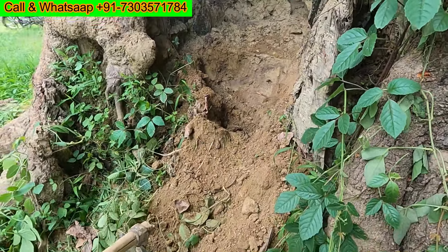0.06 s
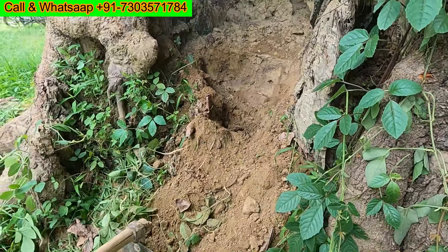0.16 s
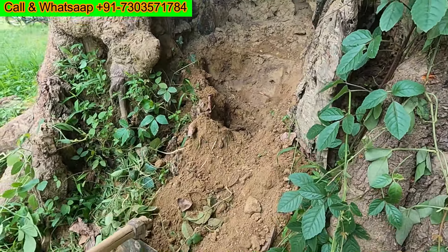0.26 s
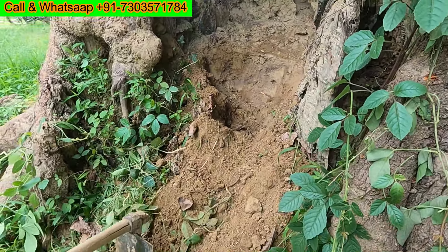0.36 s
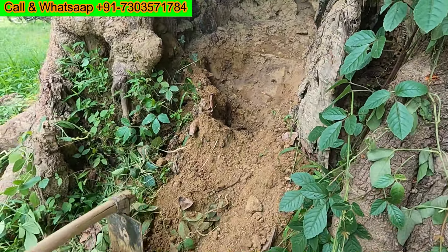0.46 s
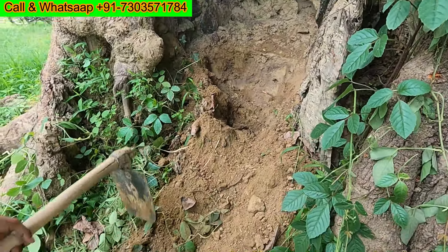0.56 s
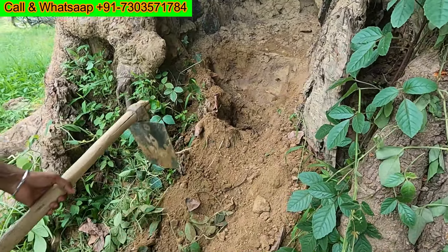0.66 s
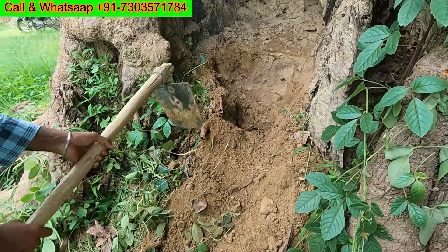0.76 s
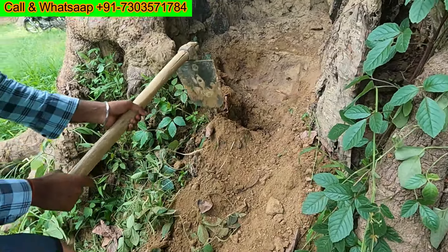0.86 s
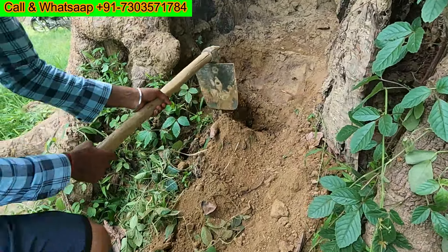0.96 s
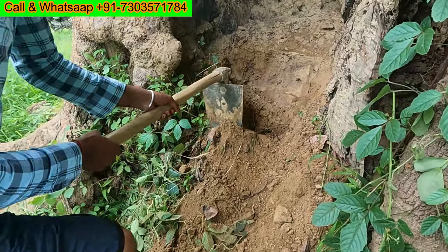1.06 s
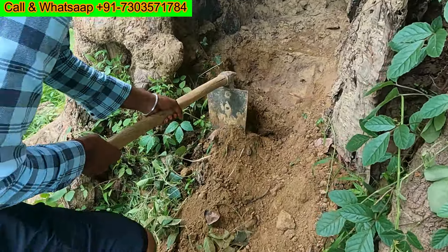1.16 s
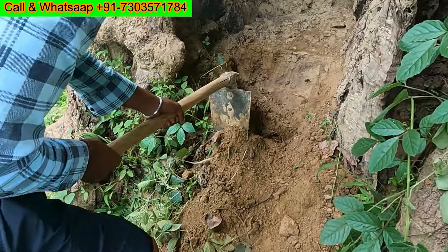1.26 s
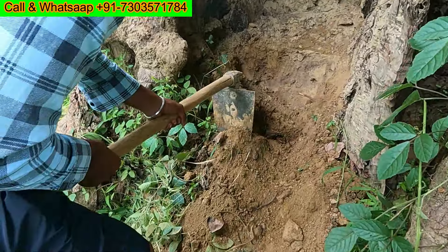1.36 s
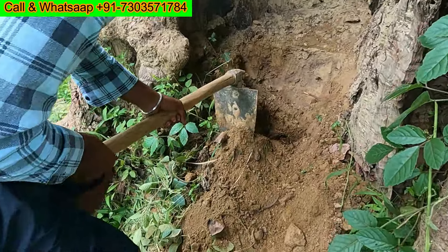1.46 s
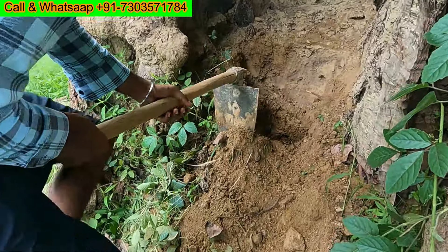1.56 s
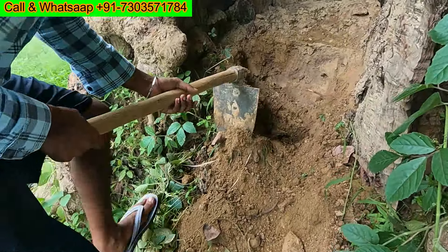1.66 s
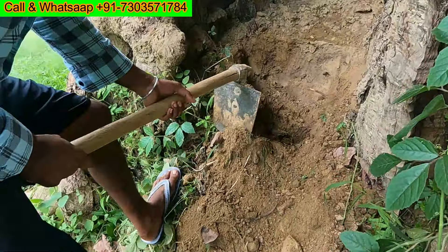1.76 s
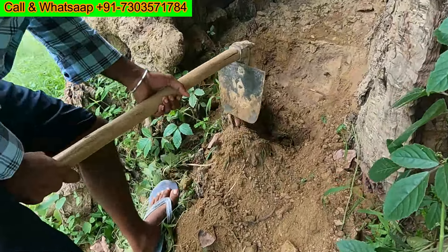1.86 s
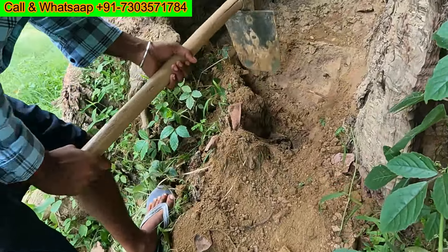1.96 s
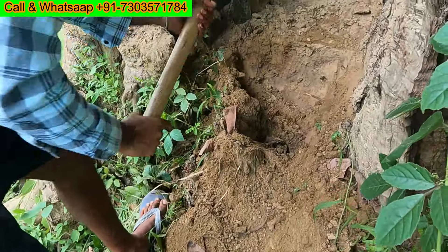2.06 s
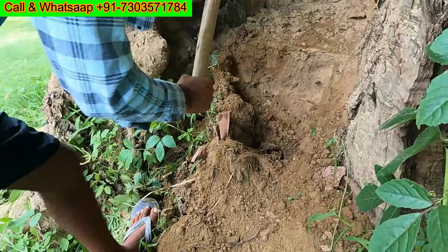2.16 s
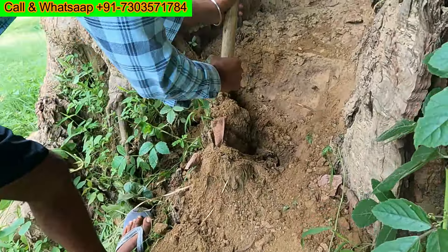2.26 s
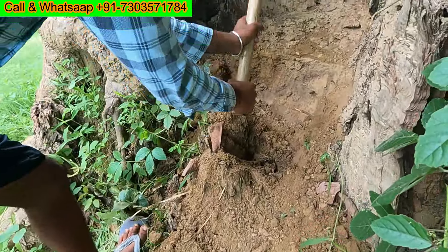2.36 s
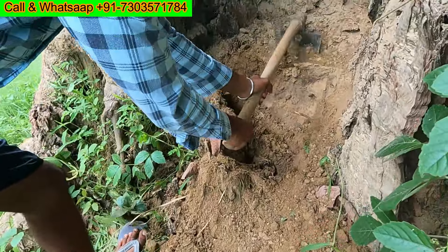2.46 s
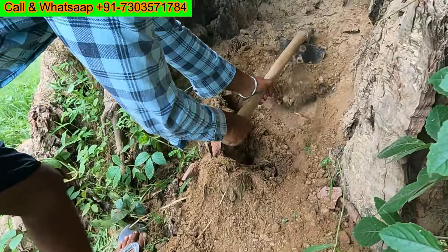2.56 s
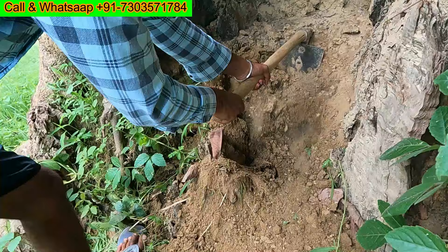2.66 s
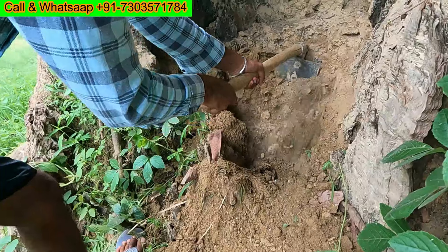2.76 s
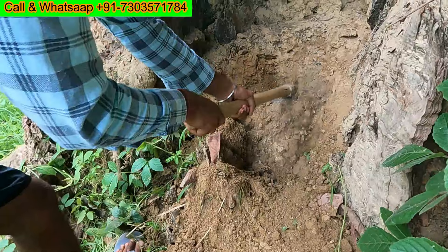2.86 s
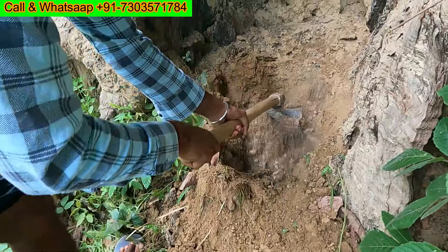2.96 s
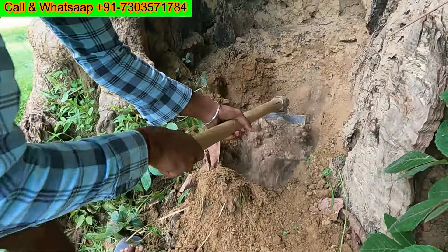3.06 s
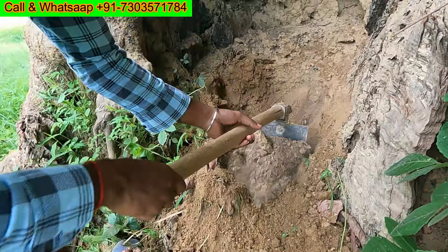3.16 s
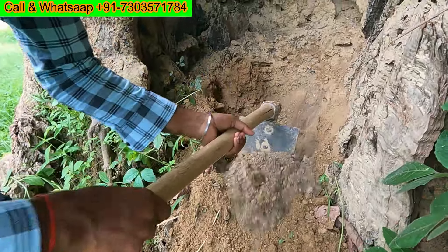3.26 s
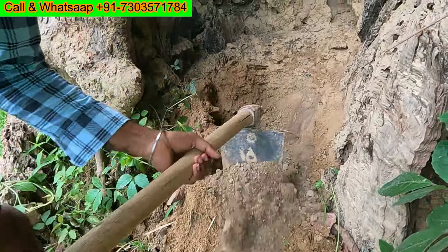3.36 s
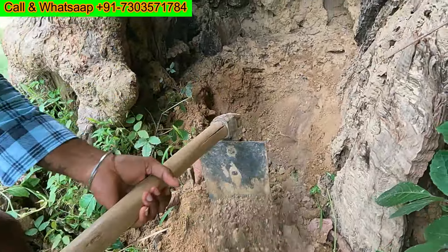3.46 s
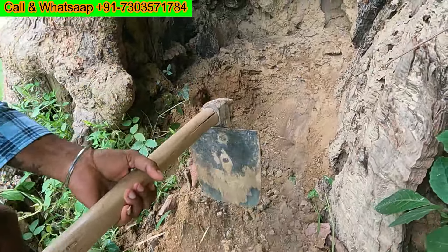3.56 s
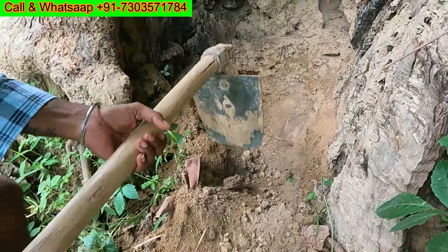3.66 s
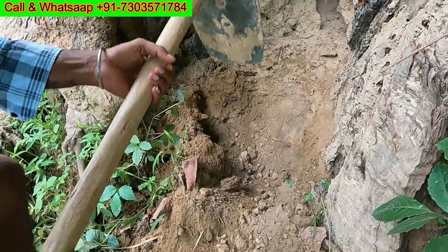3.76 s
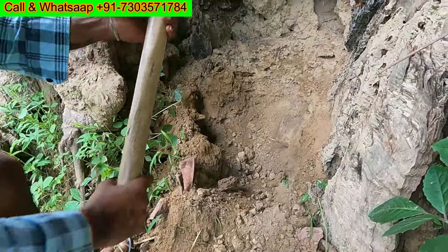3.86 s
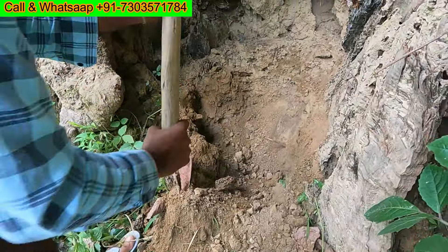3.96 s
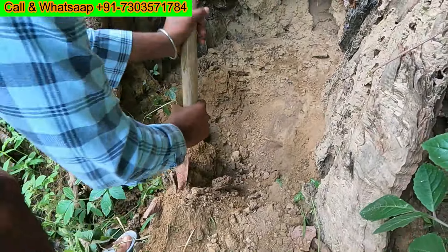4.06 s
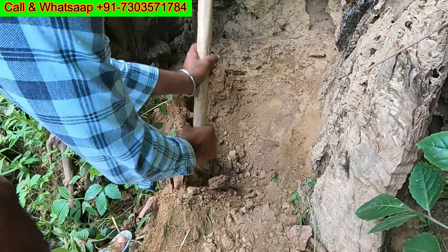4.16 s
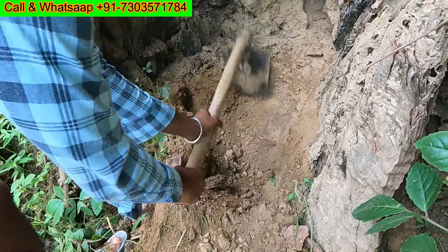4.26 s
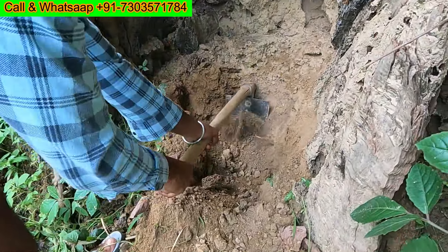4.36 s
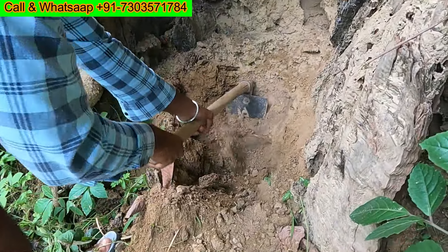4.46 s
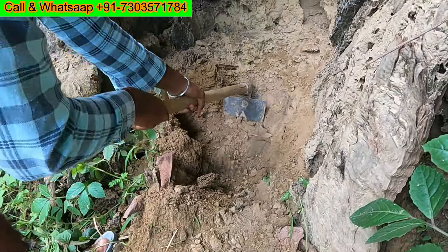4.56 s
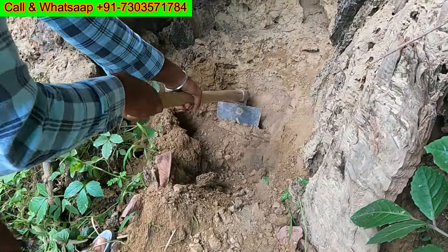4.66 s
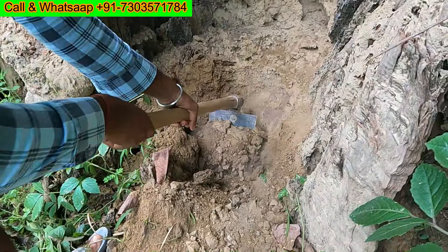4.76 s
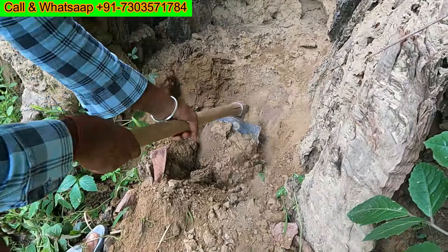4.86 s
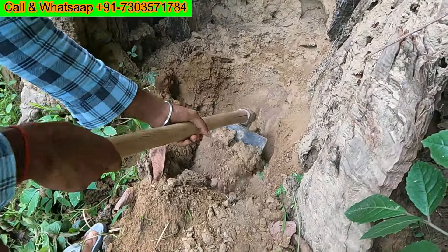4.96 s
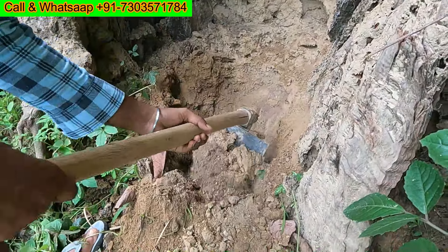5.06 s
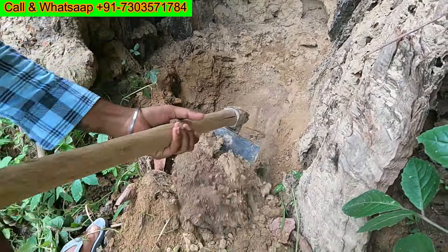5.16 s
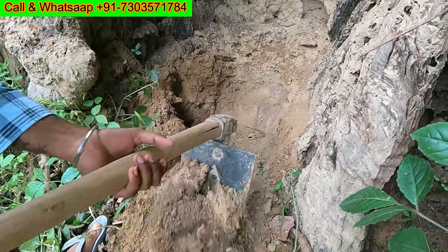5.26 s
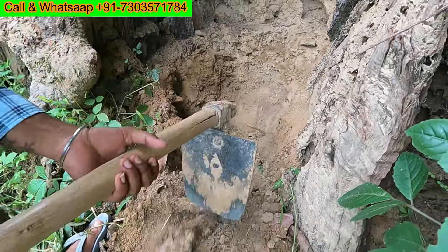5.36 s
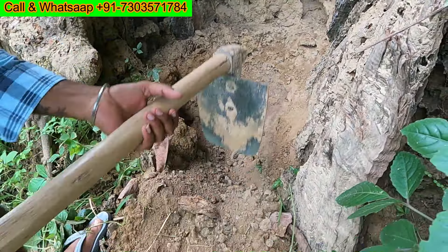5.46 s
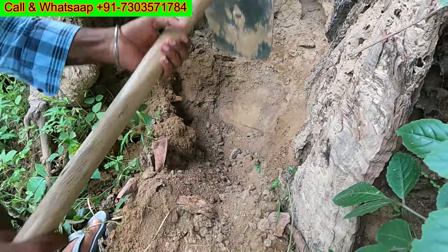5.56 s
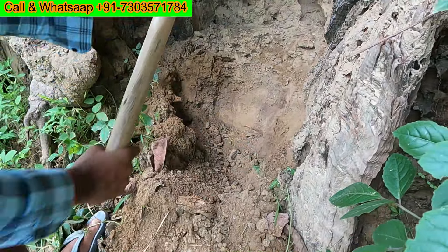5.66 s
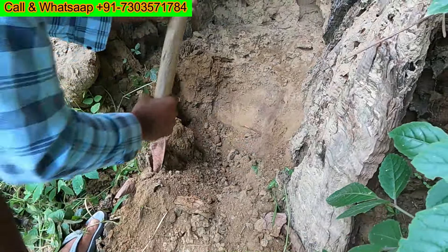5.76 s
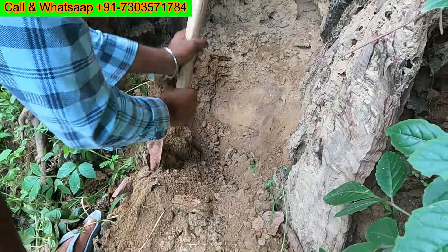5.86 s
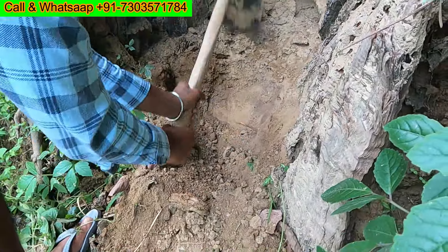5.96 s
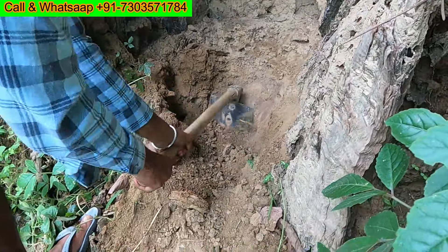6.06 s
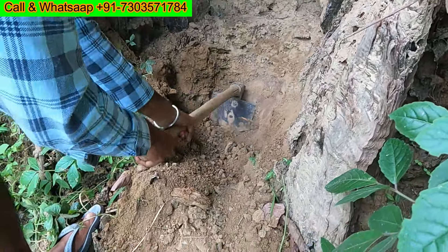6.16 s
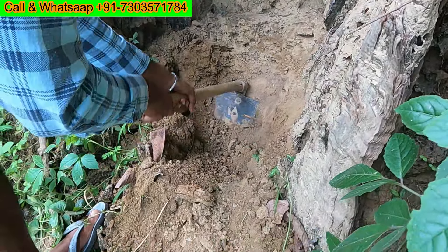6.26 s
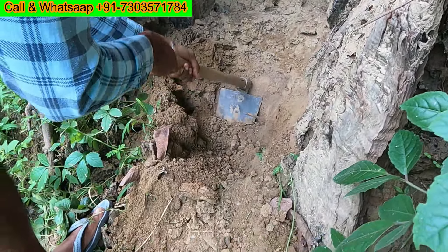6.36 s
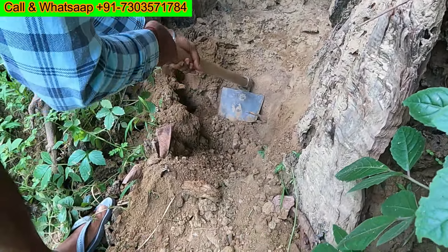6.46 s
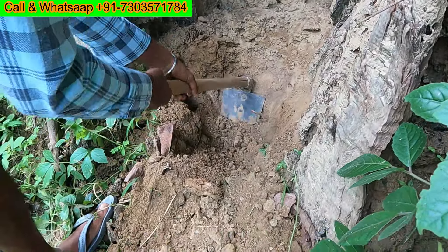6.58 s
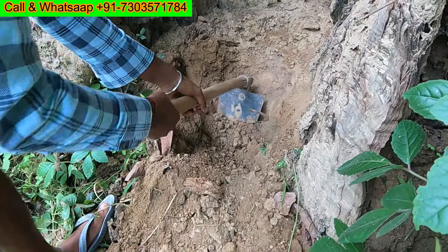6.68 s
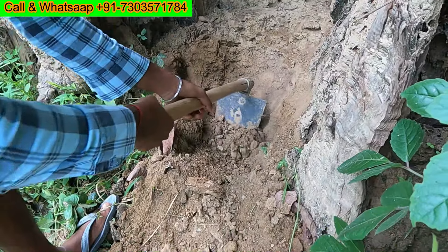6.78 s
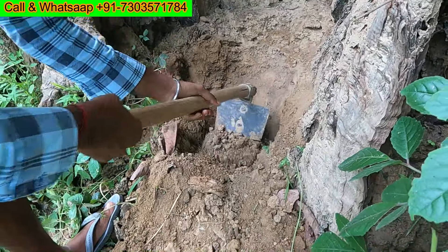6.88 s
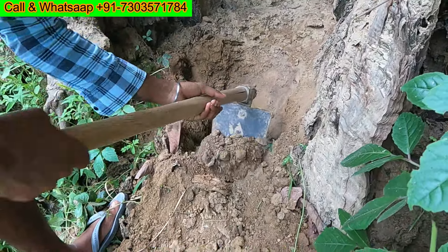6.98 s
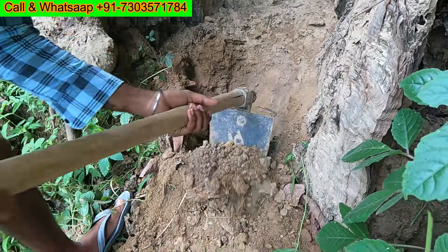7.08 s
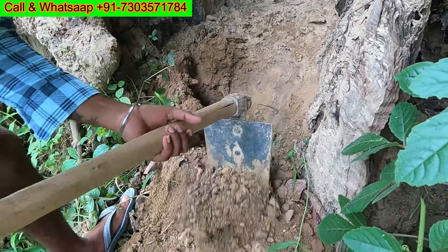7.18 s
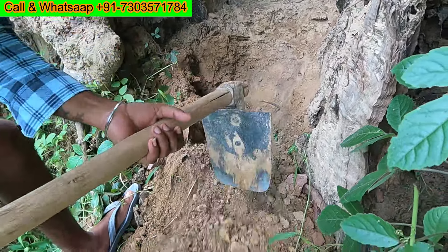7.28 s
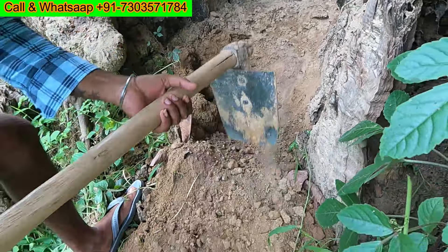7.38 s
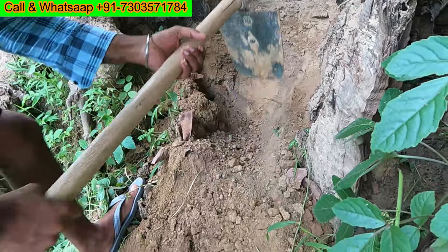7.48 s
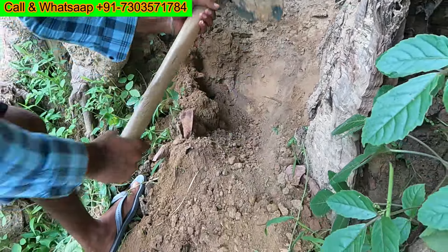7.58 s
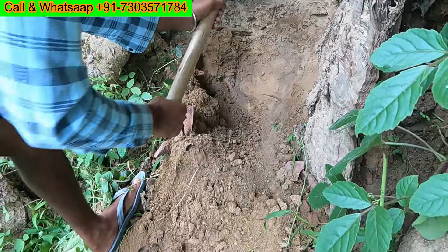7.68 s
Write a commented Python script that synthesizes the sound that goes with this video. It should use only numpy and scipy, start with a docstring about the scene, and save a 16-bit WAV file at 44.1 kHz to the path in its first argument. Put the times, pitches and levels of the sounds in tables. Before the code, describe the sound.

A steel hoe chops and scrapes dry soil outdoors, with uneven sharp strikes, dull thuds and crumbling earth under light wind.

```python
"""Hoeing dry soil beside a tree

A steel hoe chops into the soil, crushing grit, and clinks on stones and roots; the ground thuds
under blows and feet. Earth and leaves rustle, dragged clods tumble and rumble, and the wooden shaft
hums when levered. Wind blows on the microphone and a far motor drones faintly."""
import sys
import numpy as np
from scipy import signal
from scipy.fft import rfft, irfft, next_fast_len
from scipy.io import wavfile
from scipy.ndimage import uniform_filter1d, map_coordinates

SR = 44100
rng = np.random.default_rng(int(sys.argv[2]) if len(sys.argv) > 2 else 0)


def put_to_file(sound):
    """Save the sound as 16-bit audio at rate SR, in the file named by the first command-line argument."""
    columns = np.atleast_2d(sound).T  # one column per channel
    safe = np.clip(columns, -1, 1)
    whole_steps = np.round(safe * 32767)
    wavfile.write(sys.argv[1], SR, whole_steps.astype(np.int16))


N = 340452

# the steel blade's tones: (pitch [Hz], level [dB], time to fade by 60 dB when free of soil [s])
BLADE_TONES = [(613, -8.5, 0.041), (972, -7, 0.075), (1340, -9.5, 0.023), (1470, -13.5, 0.1),
               (2024, -9.5, 0.038), (2253, -9.5, 0.075), (3106, -9, 0.07), (3517, -7.5, 0.042),
               (3910, -5, 0.05), (4496, -8.5, .05), (4940, -7, 0.037), (5600, -10.5, 0.037),
               (6940, -13.5, 0.031)]
# the wooden shaft's hollow tones: (pitch [Hz], width [Hz], level [dB])
SHAFT_TONES = [(240, 50, -5), (338, 36, 2), (520, 60, -14)]
# the tone colour of packed earth: (frequency [Hz], level [dB])
CLOD_COLOUR = [(65, -10.5), (110, -6), (198, 2.5), (330, -8.5), (482, -10), (782, -10.5), (900, -22),
               (1170, -36.5), (1980, -120)]
# the thin, steady patter of earth: (time [s], level [dB])
PATTER = [(0, -58.5), (1.3, -55.5), (1.78, -60), (2.5, -61.5), (2.7, -60), (3.6, -67.5), (4.5, -63),
          (5.5, -58.5), (6.12, -64), (6.45, -71.5), (6.55, -71), (6.8, -65.5), (7.72, -71)]
# A crunch has four bands, low to high: dull, bite, bright and fizz.
FIZZ_FOLLOWS = 0.77  # how much the fizz exaggerates a bright or dull hit
# noise added on the left and taken away on the right, to widen each band
BAND_SPREAD = np.array([[1], [-1]]) * np.array([.12, .22, .25, .45])[:, None, None]


def amp(db):
    """Turn decibels into a gain."""
    return 10 ** (np.asarray(db) / 20)


def unit(x):
    """Scale a signal to an average power of 1."""
    return x / np.sqrt(np.mean(np.abs(x) ** 2) + 1e-20)


def along(points, hz):
    """Read between (Hz, value) points on a log frequency axis."""
    freqs, values = np.transpose(points)
    return np.interp(np.log(hz + 1), np.log(freqs + 1), values)


def gain_curve(points):
    """Join (s, dB) points into one gain per sample."""
    return amp(np.interp(np.arange(N) / SR, *np.transpose(points)))


def wobble(rate):
    """A smooth curve through `rate` random values a second."""
    return map_coordinates(rng.standard_normal(int(N * rate / SR) + 4), [np.arange(N) * rate / SR])


def sides(pan_db):
    """Left and right gains as two rows; a positive pan leans left."""
    return amp(np.vstack([pan_db / 2, -pan_db / 2]))


def above(hz, corner_hz):
    """A gain that lets through what lies above a corner frequency."""
    return 1 - 1 / (1 + (hz / corner_hz) ** 6)


def swell(start, rise_s, hold_s, fall_s):
    """A gain every 32 samples: climbs 12 dB per rise_s to 1 at start, holds, drops 12 dB per fall_s."""
    t = np.arange(N // 32 + 1) * 32 / SR - start
    return amp(-12 * (np.maximum(-t, 0) / rise_s + np.maximum(t - hold_s, 0) / fall_s))


def together(swells):
    """Add swells in power, as unrelated sounds do, giving one gain per sample."""
    total = np.atleast_2d(np.sqrt(np.sum(np.square(swells), axis=0)))
    return np.array([np.interp(np.arange(N) / 32, np.arange(len(row)), row) for row in total])


def colour(x, gain):
    """Filter x by gain(hz) with no ringing ahead of a hit; white noise keeps its power."""
    taps = 2 ** 15
    cepstrum = irfft(np.log(unit(gain(np.fft.rfftfreq(taps, 1 / SR))) + 1e-6), taps)
    cepstrum[1:taps // 2] *= 2  # folding moves all ringing after the hit (minimum phase)
    cepstrum[taps // 2 + 1:] = 0
    response = irfft(np.exp(rfft(cepstrum)), taps)
    size = next_fast_len(N + taps)
    return irfft(rfft(x, size) * rfft(response, size), size)[..., :N]


def resonance(tones, hz):
    """The gain of an object that rings at the given (pitch, width, level) tones."""
    return np.sqrt(sum(np.abs(amp(db) * hz * width / (pitch ** 2 - hz ** 2 + 1j * hz * width)) ** 2
                       for pitch, width, db in tones))


def blade(hz, damping):
    """The blade's resonance; soil pressing on it widens every tone."""
    tones = [(pitch, damping * np.log(1000) / np.pi / fade_s, db) for pitch, db, fade_s in BLADE_TONES]
    return resonance(tones, hz)


def gritty(shape, per_second, spread_db, share):
    """Noise with a share of its power in scattered grains of uneven size."""
    size_db = spread_db * np.clip(rng.standard_normal(shape), -2, 2)
    grains = (rng.random(shape) < per_second / SR) * amp(size_db) * np.sign(rng.standard_normal(shape))
    return np.sqrt(share) * unit(grains) + np.sqrt(1 - share) * rng.standard_normal(shape)


def patchy(x, depth_db):
    """Make random patches of time and pitch louder or softer."""
    spectra = signal.stft(x, nperseg=256)[2]
    patches = uniform_filter1d(rng.standard_normal(spectra.shape[-2:]), size=3, axis=0)
    patches = uniform_filter1d(patches, size=6, axis=1)
    return signal.istft(spectra * amp(depth_db * unit(patches)), nperseg=256)[1][..., :N]


def stereo(mid, side, spectrum):
    """Colour two noises: mid is what both ears share, side is how they differ."""
    # how alike left and right are: (frequency [Hz], likeness [0-1])
    likeness = [(30, 0.98), (90, 0.94), (400, 0.96), (2000, 0.82), (8000, 0.86), (15000, 0.43)]
    angle = lambda hz: np.arccos(along(likeness, hz)) / 2
    mid_gain = lambda hz: amp(along(spectrum, hz)) * np.cos(angle(hz))
    side_gain = lambda hz: amp(along(spectrum, hz)) * np.sin(angle(hz))
    hz = np.fft.rfftfreq(4096, 1 / SR)
    width = np.linalg.norm(side_gain(hz)) / np.linalg.norm(mid_gain(hz))
    mid = unit(colour(mid, mid_gain))
    side = width * unit(colour(side, side_gain))
    return np.array([mid + side, mid - side])


def soil():
    """Grains of earth patter in clumps over a hiss and grate along the blade; clods tumble below."""
    # earth and leaves sliding:
    # (time [s], rise [s], hold [s], fall [s], dull [dB], bright [dB], clods [dB], pan [dB])
    slides = [(0, 0.024, 0.033, 0.14, -45.5, -42, -54, .5), (0.093, 0.058, 0.12, .05, -51.5, -47, -61.5, 1),
              (0.27, 0.043, 0.065, 0.072, -46, -42.5, -57, 0.5),
              (0.554, 0.071, 0.071, .04, -48.5, -47.5, -57, 0.5),
              (0.672, 0.076, .003, 0.032, -40.5, -41, -65, -1.5),
              (0.738, 0.065, .28, .03, -57, -55.5, -65, 1.5), (1.074, 0.013, 0.15, 0.027, -46, -51, -60, 0),
              (1.826, 0.018, 0.13, 0.17, -50.5, -48.5, -58.5, .5),
              (2.321, 0.25, 0.13, 0.037, -54, -50.5, -70, 2),
              (2.797, 0.041, 0.18, 0.049, -44.5, -46.5, -48, -2),
              (3.053, .03, .06, .1, -58.5, -55.5, -52.5, -3),
              (3.164, 0.027, 0.032, .04, -48, -52.5, -50, -1),
              (3.283, 0.064, 0.036, .05, -50, -52, -47.5, -1),
              (3.447, 0.042, 0.0037, 0.18, -48.5, -47, -51.5, -1.5),
              (3.824, 0.38, .003, 0.27, -54, -50, -55.5, 1),
              (4.032, 0.051, .003, 0.14, -53, -49.5, -56.5, 1),
              (4.197, 0.023, .11, 0.015, -55.5, -54, -57, 2.5),
              (4.593, 0.025, .003, 0.06, -47, -45, -59, 3.5),
              (4.68, 0.095, 0.28, 0.085, -51, -49.5, -52.5, 1),
              (5.07, .1, 0.12, 0.034, -52.5, -55, -51.5, 0), (5.32, 0.077, .04, 0.029, -48, -47, -67, 0),
              (5.658, 0.28, .003, .08, -51.5, -51, -68, 1), (5.784, 0.25, 0.18, 0.091, -60, -55.5, -69, 1),
              (6.2, .03, 0.24, 0.044, -56.5, -62, -61, 4), (6.32, .01, 0.047, 0.025, -54, -66, -56, 0),
              (6.918, 0.045, .003, 0.17, -53, -51, -58, 0),
              (7.04, 0.042, 0.092, 0.55, -48.5, -50.5, -49, -1),
              (7.463, 0.044, .13, 0.076, -54, -47.5, -70, 1), (7.72, .02, .003, .02, -64, -47, -70, -2)]
    # heavy clods tumbling: (time [s], level [dB], fall [s])
    tumbles = [(.076, -43, 0.015), (.551, -49, 0.026), (2.066, -50, 0.049), (2.21, -57, 0.13),
               (2.842, -35, .08), (2.97, -33.5, 0.041), (4.46, -48, .02), (4.698, -55, 0.043),
               (4.924, -48.5, .12), (5.41, -52.5, 0.29), (6.2, -42, 0.033), (6.41, -50, .01),
               (6.73, -55, 0.036), (6.842, -54.5, .15), (7.08, -38, 0.048), (7.46, -54.5, .04)]
    # the tone colour of the rustle: (frequency [Hz], level [dB])
    rustle_colour = [(290, -47), (500, -14.5), (553, -17), (816, -13), (999, -6), (1110, -3.5), (1240, -4),
                     (2180, -1.5), (2510, 2), (5170, -5.5), (10200, -10.5), (12500, -23), (15700, -48.5)]
    dull_swells, bright_swells, clod_swells = [], [], []
    for *timing, dull_db, bright_db, clods_db, pan_db in slides:
        shape = swell(*timing)
        dull_swells.append(amp(dull_db) * sides(pan_db) * shape)
        bright_swells.append(amp(bright_db) * sides(pan_db) * shape)
        clod_swells.append(amp(clods_db) * shape)
    clod_swells += [amp(db) * swell(start, 0.035, 0, fall_s) for start, db, fall_s in tumbles]
    patter = gain_curve(PATTER)
    dull_gain = np.hypot(together(dull_swells), patter * sides(1))
    bright_gain = np.hypot(together(bright_swells), patter * amp(1.5) * sides(1))
    clod_gain = np.hypot(together(clod_swells), patter * amp(-6.5))

    clumps = amp(0.29 * wobble(35) + 0.97 * wobble(120))
    grains = [gritty(N, 1800, spread_db=2.5, share=0.49) * clumps for _ in range(2)]
    rustle = stereo(*patchy(grains, depth_db=2.5), rustle_colour)
    grating = lambda hz: 1.3 + blade(hz, damping=1.4)
    dull = unit(colour(rustle, lambda hz: (1 - above(hz, 2800)) * grating(hz)))
    bright = unit(colour(rustle, lambda hz: above(hz, 2800) * grating(hz)))

    lumps = amp(4.7 * wobble(30))
    clods = gritty(N, 120, spread_db=2.0, share=0.56) * lumps
    clods = stereo(clods, rng.standard_normal(N) * lumps, CLOD_COLOUR)
    clods = unit(colour(clods, lambda hz: .8 + resonance(SHAFT_TONES, hz)))
    return dull_gain * dull + bright_gain * bright + clod_gain * sides(-1.3) * clods


def low_rumbles():
    """Wind puffs on the microphone and earth rumbles as clods are dragged, over a steady breeze."""
    # the breeze: (time [s], level [dB])
    breeze = [(0, -52), (1, -45.5), (2, -49), (2.15, -63), (3, -64), (4, -54), (5, -50), (6, -59.5),
              (6.64, -64.5), (7, -64), (7.72, -58)]
    # rumbles of wind or of dragged clods: (time [s], peak [dB], rise and fall [s])
    rumbles = [(0, -39, 0.045), (.116, -40, 0.066), (.352, -41, 0.053), (.45, -34, 0.16), (.596, -41, 0.21),
               (.882, -34.5, 0.088), (1.16, -36, 0.27), (1.326, -45, 0.11), (1.63, -36.5, 0.05),
               (1.82, -38.5, 0.24), (2.199, -58, 0.081), (2.456, -50, 0.02), (2.856, -40.5, 0.054),
               (2.99, -36, 0.044), (3.29, -40.5, 0.095), (3.55, -55, 0.093), (4, -57, 0.2),
               (4.22, -59, 0.098), (4.69, -37.5, 0.054), (4.884, -40.5, 0.15), (5.26, -57, .08),
               (5.606, -45.5, 0.13), (5.882, -47, 0.11), (6.12, -43, 0.086), (6.35, -45.5, 0.14),
               (6.9, -47, .25), (7.02, -44, 0.13), (7.17, -49, 0.046), (7.348, -51, 0.068),
               (7.568, -53, 0.11)]
    # the tone colour of the rumble: (frequency [Hz], level [dB])
    rumble_colour = [(8.8, -16), (15, -8.5), (32, 4), (53, 3.5), (188, -16), (250, -23), (320, -67),
                     (550, -120)]
    lumps = amp(0.93 * wobble(9))
    mid, side = rng.standard_normal((2, N)) * lumps
    surges = together([amp(db) * swell(start, width_s, 0, width_s) for start, db, width_s in rumbles])
    return np.hypot(surges, gain_curve(breeze)) * sides(-2.0) * stereo(mid, side, rumble_colour)


def far_motor():
    """A far motor hums two fuzzy low tones that waver in loudness."""
    # the hum's resonances, applied twice: (pitch [Hz], width [Hz], level [dB])
    tones = [(78.6, 19, -4), (156.4, 18.6, 0.5)]
    hum = colour(rng.standard_normal(N), lambda hz: resonance(tones, hz) ** 2)
    return amp(-57.5 + 3.05 * wobble(2.65)) * unit(hum)


def open_air():
    """The outdoors hisses softly, with separate noise on each side."""
    # the tone colour of the hiss: (frequency [Hz], level [dB])
    hiss_colour = [(150, -33.5), (250, 3.5), (870, -14.5), (1030, -9.5), (2220, -16.5), (3140, -17),
                   (5000, -20.5), (10000, -22), (15700, -53)]
    return amp(-66.5) * colour(rng.standard_normal((2, N)), lambda hz: amp(along(hiss_colour, hz)))


def crunch(bands):
    """Four bands of crushed grit shake the blade while the soil muffles its ring."""
    # the tone colour of steel hitting grit: (frequency [Hz], level [dB])
    strike_colour = [(240, -43.5), (400, -4), (488, -9.5), (1520, 4.5), (1800, 2.5), (2230, -2), (2690, -2),
                     (3490, -10), (10500, -15), (13100, -33.5), (15700, -62.5)]
    steel = lambda hz: amp(along(strike_colour, hz)) * (.5 + blade(hz, damping=3.5))
    dull, bite, bright, fizz = bands[..., :N]
    return (colour(dull, lambda hz: steel(hz) * (1 - above(hz, 1610)))
            + colour(bite, lambda hz: steel(hz) * above(hz, 1540) * (1 - above(hz, 3630)))
            + colour(bright, lambda hz: steel(hz) * above(hz, 3400) * (1 - above(hz, 7100)))
            + amp(-9.5) * colour(fizz, lambda hz: steel(hz) * above(hz, 7100)))


def clink(t, dull_db, bright_db, damping):
    """The struck blade rings; each blow lands elsewhere and stirs a new mix of its tones."""
    hz, tone_db, fade_s = np.transpose(BLADE_TONES)[:, :, None]
    strength_db = 2.5 * rng.standard_normal(hz.shape)
    phase = 2 * np.pi * rng.random(hz.shape)
    contact_db = 0.86 * bright_db * above(hz, 3500) + dull_db * (1 - above(hz, 2000))
    fade = amp(tone_db + contact_db + strength_db - 60 * damping * t / fade_s)
    return np.sum(fade * np.sin(2 * np.pi * hz * t + phase), axis=0) * (1 - np.exp(-t / 0.0025))


def pebbles(count):
    """Small knocks at random moments, louder where the patter of earth is louder."""
    chance = np.array([(rng.random(), rng.standard_normal()) for _ in range(count)])
    times = chance[:, 0] * N / SR
    levels_db = np.interp(times, *np.transpose(PATTER)) + 9 + 2.5 * chance[:, 1]
    tone_db = (-11.5, -13, 6, -11)  # shaft, dull, bright, ring
    return [(start, db, *tone_db) for start, db in zip(times, levels_db)]


def knocks():
    """Hitting something hard makes a crack, a clink of steel and a hollow knock in the shaft."""
    # stones, roots and clods struck, the last four columns relative to the crack:
    # (time [s], crack [dB], shaft [dB], dull [dB], bright [dB], ring [dB])
    hits = [(.0696, -35, 0, -4.5, -0.5, 3), (.3033, -37, -29, 8.5, -5, -22), (.82, -52, -17, -15, 9, -15),
            (.847, -53, -10, -11, 3, -22), (.9715, -31, -27, -20, -15, 2), (.9984, -20, -32, -16, -20, -11),
            (1.018, -30.5, -24, -7, -9.5, -12), (1.102, -21, -25, -10, -4, -0.5),
            (1.1449, -29.5, -21, -3, 3, 7.5), (1.1601, -22.5, -27, -11, -5, -3),
            (1.1698, -24, -21, -12, -1.5, -8), (1.1996, -24, -16, -6, 4.5, -8.5),
            (1.4324, -30.5, -20, -6.5, -1, -9), (1.463, -15.5, -27, -9.5, -3.5, -8),
            (1.4757, -28.5, -16, -10, -2, -11), (1.5447, -39, -10, -5, -1.5, 0),
            (1.5583, -18.5, -23, -9.5, -3, -8), (1.5769, -29.5, -9, -5, 4.5, -6),
            (1.5931, -26, -22, -4, -7.5, 7), (1.6058, -26.5, -13, -0.5, -5, -6.5),
            (1.6623, -33, -18, -12, -13, -11), (1.6864, -24, -10, -6.5, -4.5, 1.5),
            (1.8547, -32.5, -30, -18, -1, -35), (1.8728, -21.5, -35, -19, -2, -11.5),
            (1.8859, -29, -27, -10, -6, -16), (2.3868, -40, -20, -28, 4, -17),
            (2.4296, -34, -24, -27, 1.5, -8), (2.5393, -14.5, -6.5, -5.5, -17, 9),
            (2.5497, -12, -17, -8, -22, -4), (2.6846, -35, -15, -29, -8.5, -31),
            (2.7558, -44, 5, -13, 5.5, -2), (2.821, -21.5, -24, -17, -5.5, -2),
            (3.1514, -38.5, -11, -5, 1, -3), (3.2237, -49.5, 17.5, -8, -15, -10),
            (3.2577, -40.5, 13.5, -3, -17, -6), (3.2894, -36.5, -7, -9, 0.5, 8),
            (3.3151, -29, -11, -8, -12, -5), (3.3254, -18.5, -15, -13, -11, 1),
            (3.3937, -45, -2, -17, -2, 14.5), (3.4266, -36, -12, -11, -2.5, 8.5),
            (3.4375, -42, -11, -1, -0.5, -7), (3.4623, -41, -9, -10, 2, 0), (3.8078, -39.5, 2, 0.5, 2, -21),
            (4.2925, -38.5, -18, -29, -3.5, -3), (4.409, -20, 1, 7.5, -26, -17),
            (4.69, -42.5, 17, -18, -10, -10), (5.1662, -14, -2, -3, -12, -1),
            (5.219, -29.5, -10, -2, -13, 3), (5.291, -27.5, -30, -20, 6, -20),
            (5.3248, -30, -8.5, -15, -6.5, -7), (5.3717, -38.5, -13, -3.5, 0, 1),
            (5.7671, -46, -8, -22, 6, -10), (5.8588, -53, -6, -15, 12, -11),
            (6.1685, -6, -19, -1, -8.5, -9.5), (6.3132, -23.5, 3, 10.5, -10.5, -7.5),
            (6.3485, -37, -7, 8, -16, -11), (6.3834, -26, 14, 6, -6.5, -2),
            (6.6912, -30, 9.5, -1, -12.5, -15), (6.718, -31.5, 1, -9, -19, -2),
            (6.7598, -41.5, 0, -7, -8.5, -6), (6.8455, -42.5, 10, 6, -28, -4),
            (6.931, -41, 13, -2.5, 0.5, -8), (7.0768, -12, -13, -5, -12, 5),
            (7.138, -31.5, -12, -14, -12, 4), (7.3106, -42, 3, -4, 0.5, -1),
            (7.4664, -42.5, -24, -8, 5.5, 11), (7.5234, -29, -20, -12, -3.5, -10),
            (7.5986, -35, -19, -9.5, -7, -4)]
    bands = np.zeros((4, 2, N + SR))
    wood, ring = np.zeros((2, 2, N + SR))
    t = np.arange(SR // 10) / SR
    crack, crumble = amp(-60 * t / 0.012), amp(-17 - 60 * t / 0.053)
    snap = np.exp(-t / 0.00057)  # shapes the first instant of the hit
    force = (crack + crumble) * (1 - snap) * (1 + 1.71 * snap)
    for start, db, shaft_db, dull_db, bright_db, ring_db in hits + pebbles(count=40):
        at = round(start * SR)
        pan = sides(-1.3 + 1.5 * rng.standard_normal())
        grit = np.sign(rng.standard_normal((4, 1, len(t)))) + BAND_SPREAD * rng.standard_normal(len(t))
        bands_db = np.array([dull_db + 1, -4, bright_db + 0.5, (1 + FIZZ_FOLLOWS) * bright_db + 3.5])
        bands[..., at:at + len(t)] += amp(db + bands_db)[:, None, None] * force * pan * grit
        wood[:, at + 60] += amp(db + shaft_db + 14) * pan[:, 0]
        damping = 1.8 if start > 2.3 else 1  # once digging is under way, soil clings to the blade
        ring[:, at:at + len(t)] += amp(db + ring_db) * pan * clink(t, dull_db, bright_db, damping)
    hollow = colour(wood[:, :N], lambda hz: resonance(SHAFT_TONES, hz) / (1 + (hz / 700) ** 2))
    return crunch(bands) + hollow + ring[:, :N]


def ground_thuds():
    """The ground booms under a blow or footstep, swelling quickly and sagging in pitch."""
    # booms and hollow knocks: (time [s], pitch [Hz], level [dB], time to fade by 60 dB [s])
    thuds = [(.07, 160, -27.5, 0.071), (0.55, 123, -15.5, 0.045), (0.592, 44, -18, 0.098),
             (1.105, 144, -20.5, 0.098), (1.204, 55.7, -19.5, 0.22), (2.563, 75.4, -7.5, 0.026),
             (2.617, 70, -18.5, 0.083), (4.407, 215.4, -17.5, 0.075), (4.414, 78.5, -3.5, 0.043),
             (4.445, 69.6, -21, 0.16), (5.172, 147.6, -14, 0.098), (5.167, 671, -9.5, 0.019),
             (6.158, 138.7, -11.5, 0.11), (6.172, 63, -6.5, 0.13), (6.215, 66, -27, 0.076),
             (6.39, 63.5, -26, 0.16), (6.698, 67.7, -32.5, 0.14), (7.077, 131, -18.5, 0.085),
             (7.089, 95, -25, 0.13)]
    out, t = np.zeros(N + SR), np.arange(SR // 3) / SR
    for start, hz, db, fade_s in thuds:
        cycles = hz * (t + 0.0028 * (1 - np.exp(-t / 0.0049)))
        gain = amp(db - 60 * t / fade_s) * (1 - np.exp(-t / 0.0026))
        out[round(start * SR):][:len(t)] -= gain * np.sin(2 * np.pi * cycles)
    return out[:N] * sides(-0.85)


def chops():
    """The blade bites into the soil, crushing grit and thumping the packed earth."""
    # cuts into the soil: (time [s], length [s], share spent rising [0-1],
    # dull [dB], bite [dB], bright [dB], earth [dB], pan [dB])
    cuts = [(0.289, 0.034, 0.49, -33.5, -38.5, -37, -67, 1.5),
            (0.952, 0.11, 0.13, -49, -41.5, -52, -78.5, 1), (1.097, 0.12, 0.01, -36, -33.5, -32, -50, 1),
            (1.184, 0.037, 0.17, -28.5, -34, -38, -33.5, -1.5),
            (1.558, .07, 0.17, -46.5, -45, -41.5, -57, 0), (1.821, 0.1, 0.25, -55, -41, -38, -63, 1),
            (2.538, 0.082, 0.22, -27, -25.5, -26, -27, -1.5),
            (4.39, 0.061, 0.33, -27, -31.5, -29, -35, -1.5),
            (5.163, 0.033, 0.37, -22.5, -23.5, -25.5, -20, 0.5), (5.291, 0.019, 0.5, -62, -40, -29, -51, 1),
            (6.158, 0.024, 0.12, -24, -27, -27.5, -18.5, 1.5),
            (6.667, 0.049, 0.51, -43, -41, -45.5, -64.5, -1),
            (7.063, 0.028, 0.7, -28, -27, -30.5, -28.5, -1)]
    bands, earth = np.zeros((4, 2, N + SR)), np.zeros((2, N + SR))
    for start, length_s, rise, dull_db, bite_db, bright_db, earth_db, pan_db in cuts:
        at, n = round(start * SR), round(length_s * SR)
        progress = np.arange(n) / (length_s * SR)
        rise = max(rise, .02)
        fall = amp(-18 * (progress - rise) / (1 - rise)) * np.sqrt(np.clip(4 * (1 - progress), 0, 1))
        force = np.minimum((progress / rise) ** 2, fall)
        fizz_db = bright_db + FIZZ_FOLLOWS * (bright_db - bite_db)
        gains = amp([dull_db, bite_db, bright_db, fizz_db])[:, None, None]
        grit = gritty((4, 1, n), 1600, spread_db=4, share=0.29) + BAND_SPREAD * rng.standard_normal(n)
        bands[..., at:at + n] += gains * force * sides(pan_db) * grit
        lumps = gritty(n, 400, spread_db=2.0, share=0.9)
        earth[:, at:at + n] += amp(earth_db) * np.sin(np.pi * progress) * sides(pan_db) * lumps
    return crunch(bands) + colour(earth[:, :N], lambda hz: amp(along(CLOD_COLOUR, hz)))


def shaft_hum():
    """Grating earth shakes the wooden shaft into a hollow hum."""
    # levering and dragging the blade: (time [s], rise [s], hold [s], fall [s], level [dB])
    pulls = [(3.197, .1, 0.085, 0.036, -62), (4.68, .03, .02, 0.086, -55), (4.895, 0.12, 0.32, .05, -58),
             (6.706, .01, .03, 0.048, -56), (6.866, 0.022, 0.23, 0.11, -53)]
    gain = together([amp(db) * swell(*timing) for *timing, db in pulls])
    shake = gritty(N, 83, spread_db=-2, share=0.69)
    return gain * sides(-1.1) * unit(colour(shake, lambda hz: resonance(SHAFT_TONES, hz) ** 2))


def scene():
    """Mix the digging with the outdoor background."""
    digging = chops() + knocks() + ground_thuds() + shaft_hum() + soil()
    return digging + low_rumbles() + far_motor() + open_air()


def record(dry):
    """Loud peaks are gently rounded to avoid clipping; the microphone colours the treble."""
    # the microphone's treble: (frequency [Hz], gain [dB])
    treble = [(7500, -0.5), (8200, -5.5), (10600, -4.5), (11400, -5), (15000, 10.5)]
    # how much louder its left side is than its right: (frequency [Hz], pan [dB])
    balance = [(200, 0), (700, -1.2), (3000, -0.5), (8000, 1), (15000, 2)]
    ceiling, top_hz = 0.8, 15750
    size = next_fast_len(N + 4096)
    hz = np.fft.rfftfreq(size, 1 / SR)
    rounded = dry / (1 + np.abs(dry / ceiling) ** 4) ** (1 / 4)
    response = amp(along(treble, hz)) * sides(along(balance, hz)) * (hz < top_hz)
    return irfft(rfft(rounded, size) * response, size)[:, :N]


dry = scene()
out = record(dry)
put_to_file(out)
```